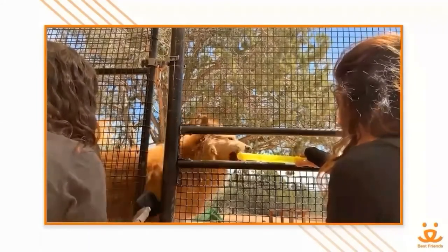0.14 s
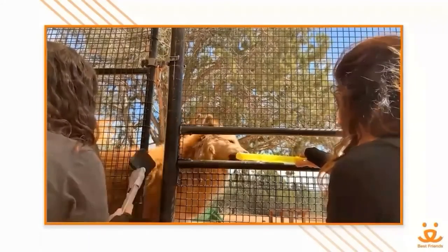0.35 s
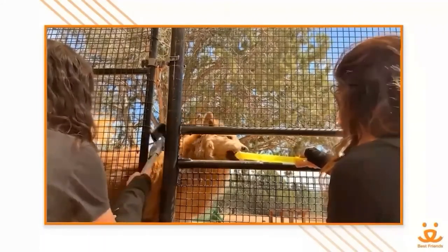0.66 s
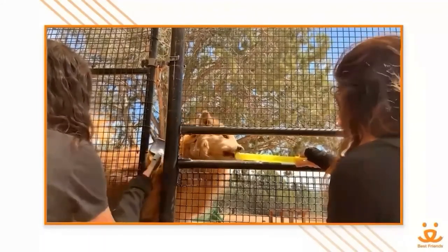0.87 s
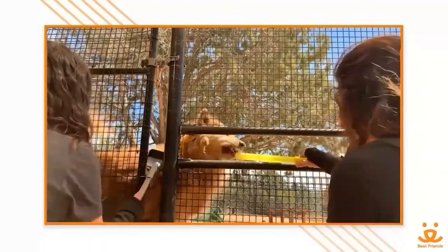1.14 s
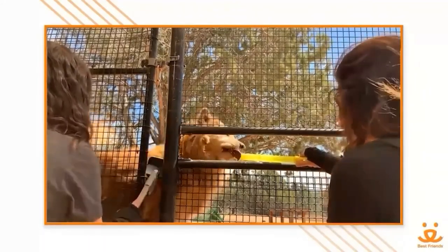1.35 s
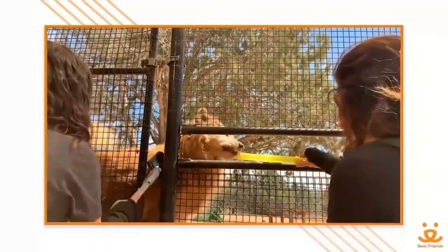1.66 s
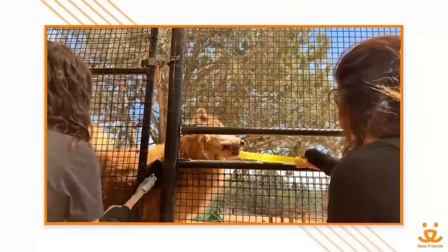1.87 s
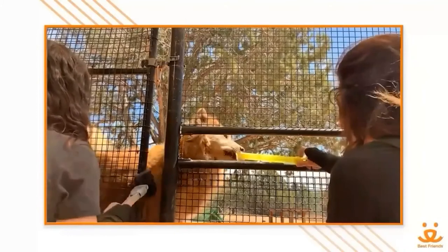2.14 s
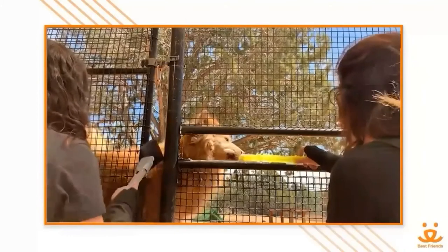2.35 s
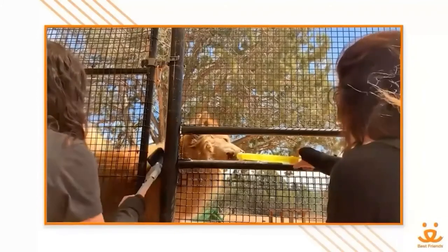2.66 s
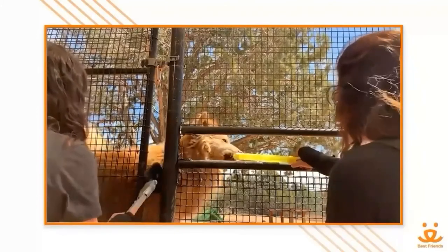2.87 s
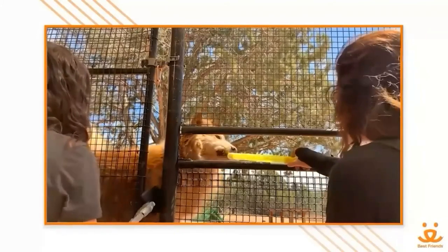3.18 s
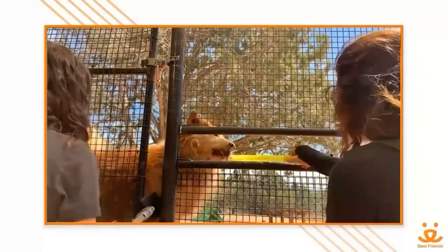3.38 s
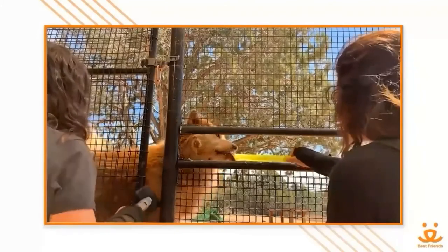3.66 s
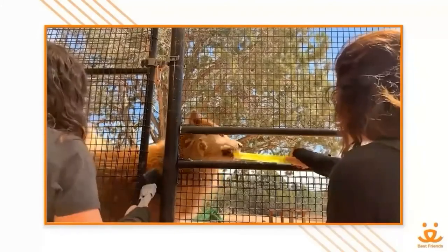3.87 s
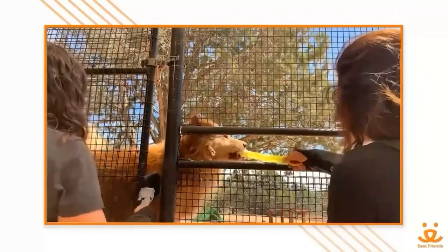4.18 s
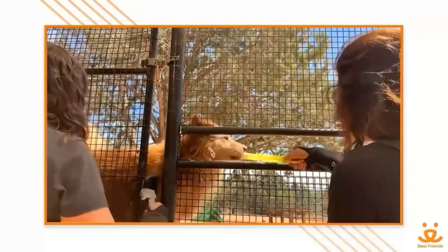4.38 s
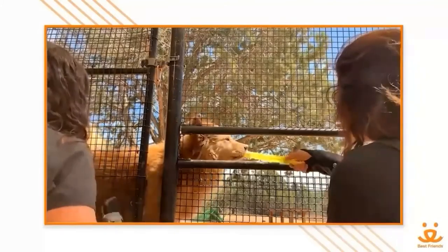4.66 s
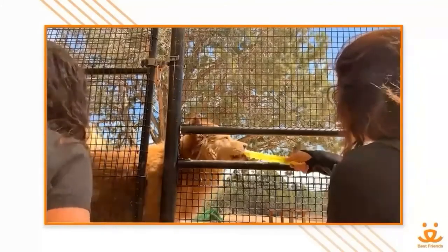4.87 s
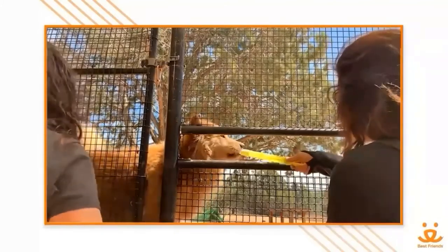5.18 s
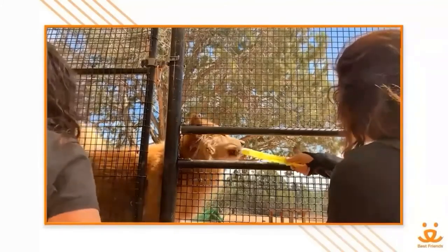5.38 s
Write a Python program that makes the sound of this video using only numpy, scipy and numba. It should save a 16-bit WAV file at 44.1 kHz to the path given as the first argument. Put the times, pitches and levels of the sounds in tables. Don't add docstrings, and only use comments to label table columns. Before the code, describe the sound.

Wet lapping, mouth pops and scratchy brush strokes beside a wire pen, with a low distant engine and wind buffeting the microphone.

```python
import sys
import numpy as np
from scipy import signal
from scipy.fft import rfft, irfft
from scipy.io import wavfile
from scipy.ndimage import uniform_filter1d
from numba import njit

SR = 44100
rng = np.random.default_rng(int(sys.argv[2]) if len(sys.argv) > 2 else 0)


def gain_from_db(level_db):
    decades = np.asarray(level_db, float) / 20
    return 10 ** decades


def output_pcm(signal):
    pcm = np.clip(np.atleast_2d(signal).T, -1, 1) * 32767
    wavfile.write(sys.argv[1], SR, np.round(pcm).astype(np.int16))


N = 244049
TIME = np.arange(N) / SR

# pitch_hz, level_db (per Hz)
AIR_COLOUR = [(150, 19.5), (200, 5.5), (285, 0), (370, 3.5), (700, -9), (980, -13), (1350, -11.5),
              (2100, -25.5), (3100, -35.5), (7500, -38), (9000, -26), (10000, -46), (11800, -31),
              (12700, -47.5)]
# time_s, gust_db
GUSTS = [(0, -60.5), (.37, -61.5), (.47, -64), (.7, -60.5), (1.7, -64.5), (2, -57), (2.4, -66.5),
         (2.65, -62), (3.15, -61.5), (3.5, -56), (3.72, -56.5), (3.9, -59.5), (4.08, -58), (4.3, -60.5),
         (4.42, -64), (4.6, -57), (4.8, -60.5), (5.53, -63)]
# time_s, peak_db, centre_hz
BUFFETS = [(0.099, -34, 66), (3.308, -26.5, 94), (3.341, -23.5, 98), (3.499, -25, 115), (3.781, -27, 150),
           (3.68, -30, 160), (.3, -34, 149), (4.036, -24, 98.4), (3.3, -30, 70), (4.32, -34, 80),
           (.13, -33, 140), (4.52, -28.5, 101), (4.631, -30, 129), (4.686, -23, 111), (3.512, -18.5, 120),
           (3.585, -16, 103), (3.696, -16, 98.3), (4.063, -19.5, 91.5), (4.479, -23, 71), (4.555, -24, 136),
           (4.592, -32.5, 145)]
# time_s, firing_hz, drone_db
ENGINE_PULLS = [
    [(.67, 71.9, -49.5), (.95, 75.7, -33), (1.06, 71.3, -35.5), (1.15, 72, -43.5), (1.28, 78, -32),
     (1.57, 80.9, -31.5), (2.05, 89.54, -30.5), (2.74, 102, -34.5), (3.45, 108.5, -39)],
    [(4.8, 81.7, -51.5), (4.884, 84.24, -36), (5.06, 85.85, -35.5), (5.14, 84.67, -30.5),
     (5.53, 89.96, -29)],
]
# time_s, peak_db, rattle_s, ring_share (0 to 1)
RATTLES = [
    (1.036, -48, .03, .9),
    (1.571, -58, .03, .5),
]
# pitch_hz, level_db, t60_s (time to fade by 60 dB)
WIRE_MODES = [(2450, -9, .1), (3680, -4, .14), (4745, -2, .2), (4823, -3, .2), (5245, 2, .22),
              (6022, -3, .1), (6128, 0, .13), (6250, -4, .14), (6350, -6, .1), (7500, -1, .08),
              (8010, 0, .1), (8420, 0, .07), (8662, 1, .08), (9400, -3, .07)]
# pitch_hz, width_hz, level_db
BRISTLE_CAVITIES = [
    (7380, 2700, 4.5),
    (8800, 4200, 11),
]
# start_s, held_s, hiss_db, scrape_db, sheen_db (last two against hiss)
DRAGS = [(0, 0.05, -68.5, -16, -19), (.1, 0.08, -78.5, -10, -16.5), (.22, 0.115, -70, -13, -14),
         (.58, 0.032, -88.5, 8.5, -7), (.72, 0.063, -88, 3.5, -4.5), (1.38, 0.04, -78, -13.5, -12),
         (1.63, 0.059, -78.5, -12.5, -8.5), (1.92, 0.11, -77.5, -16.5, -17.5), (2.05, 0.1, -69, -17.5, -4),
         (2.2, 0.27, -94.5, 6.5, -22.5), (2.7, 0.13, -88.5, 1, -9), (3.005, .13, -69, -27, -9),
         (3.17, .09, -76, -19, -13), (3.32, .115, -72, -20.5, -13), (3.601, 0.13, -75, -11, -12),
         (3.8, .15, -83, -5, -7), (4.25, 0.075, -94.5, -7, -18), (4.52, 0.07, -87, -9, -29),
         (5.065, 0.034, -85.5, -9, -7), (5.46, .07, -91, -15, -43)]
# start_s, held_s, hiss_db, scrape_db, sheen_db (as above)
JABS = [
    (.8, 0.043, -73, -3.5, 0.5),
    (1.042, 0.019, -72, -0.5, 4),
    (1.196, 0.014, -77, -4, -24),
    (1.582, 0.013, -72, -16, -6),
    (2.505, 0.014, -85, -6.5, -35),
    (4.69, 0.0088, -88.5, -3, -19),
    (4.77, 0.0067, -91, -5, -20),
]
# level_db of hiss, scrape, sheen
FUR_RUSTLE = [
    -94,
    -97,
    -120,
]
# start_s, held_s, level_db
WHISTLES = [(.235, 0.014, -63.5), (.8, .012, -70), (1.585, 0.0093, -74.5), (2.062, .02, -63),
            (2.1, .05, -60), (2.78, 0.009, -79), (3.07, 0.021, -54.5), (3.33, 0.099, -72.5),
            (3.61, 0.0088, -79), (3.83, .01, -83)]
# start_s, held_s,
# level_db, pitch_hz, width_hz
HUMS = [(0, 0.071, -75, 7100, 250), (0, 0.067, -77, 8840, 250), (.115, .03, -78, 7340, 400),
        (.225, 0.084, -77.5, 7300, 500), (1.87, 0.11, -79, 7250, 900), (2.0, 0.16, -71.5, 7200, 500),
        (2.99, 0.068, -76.5, 7330, 300), (3.415, 0.018, -73, 7300, 300), (3.65, 0.11, -80.5, 6830, 500),
        (3.82, 0.03, -80, 8310, 400), (3.9, 0.037, -77, 8340, 400), (4.49, .11, -82, 7170, 390),
        (4.25, 0.077, -87, 9100, 500), (1.59, 0.027, -80, 4930, 800), (1.585, .03, -77, 6100, 200),
        (.8, .012, -68, 1250, 200), (.392, .01, -72, 980, 200), (1.04, .08, -78, 2800, 900),
        (2.0, .14, -84, 4800, 1500), (4.5, .09, -88, 5200, 1200), (3.085, .03, -70, 760, 200),
        (3.06, 0.029, -81, 4450, 300), (3.06, 0.012, -88.5, 3350, 300), (3.73, .06, -85.5, 2400, 300)]
# pitch_hz, width_hz, level_db
MOUTH = [
    (705, 140, 2.5),
    (1162, 210, 0),
    (1600, 250, -10.5),
    (2400, 120, -11.5),
]
# start_s, held_s, slosh_db, mouth_opening_db
LAPS = [(0, 0.034, -61.5, -7.5), (.28, 0.087, -65.5, -7), (.8, 0.023, -64, -6.5), (1.3, 0.061, -69.5, -2.5),
        (1.63, 0.034, -70, 0), (2.02, 0.062, -67.5, -3.5), (2.505, 0.0073, -69, -6), (2.78, 0.053, -83, 1),
        (3.031, 0.066, -69.5, -3), (3.32, 0.059, -72, -1), (3.619, 0.1, -75, 1), (3.9, 0.034, -78.5, 0),
        (4.27, 0.036, -73.5, -12), (4.685, .015, -82.5, 0)]
# time_s, jaw_db, cheek_db
CHEWING = [
    (0, -72.5, -78),
    (5.53, -80.5, -90.5),
]
# start_s, held_s, level_db, pitch_hz
SQUELCHES = [
    (3.626, 0.069, -76.5, 1250),
    (3.711, 0.044, -73, 1260),
    (3.801, 0.05, -70.5, 1300),
    (3.836, 0.032, -67, 770),
    (3.905, 0.033, -69, 1240),
]
# time_s, peak_db, jaw_hz, mouth_opening_db, wetness_db
SMACKS = [(.282, -47.5, 800, 8.5, 0.5), (.389, -49.5, 725, -4.5, -18), (.615, -61.5, 695, -8, -25),
          (0.7993, -41, 583, -2.5, -17), (1.294, -59, 566.3, -13, -24), (1.344, -47, 652, -6, -18),
          (1.408, -51.5, 726, -1, -12), (1.659, -55.5, 587, -5, -12.5), (2.037, -52, 720, -10.5, -16),
          (2.067, -53, 549, -3.5, -2), (2.502, -43.5, 790, -0.5, -11), (2.53, -60.5, 580, 3.5, -12),
          (2.716, -72, 623, 4, 9.5), (2.777, -56.5, 619, -1, 9), (2.825, -48, 600, -9, -12.5),
          (3.028, -50, 738, -6.5, -13), (3.086, -50, 754, -25, 2), (3.623, -61.5, 730, -2, -12),
          (3.846, -60, 770, 3, -17), (3.897, -59, 790, 4, -0.5), (3.994, -54.5, 778, -0.5, -21.5),
          (4.305, -65.5, 600, 4, -16), (4.682, -50, 840, -3.5, -0.5), (4.766, -56, 780, -8, 2)]
# time_s, peak_db
TICKS = [(.723, -74), (0.768, -57), (.797, -38.5), (0.876, -67), (1.72, -72.5), (3.065, -54.5),
         (3.103, -55.5), (3.217, -61), (4.785, -73), (5.056, -69.5)]
# time_s, peak_db,
# pitch_hz, width_hz
CLICKS = [(.2825, -52, 2360, 300), (.2836, -55, 3460, 400), (0.388, -67.5, 4500, 600),
          (.391, -52, 980, 200), (.282, -53, 5500, 2500), (.797, -50, 4500, 3500), (2.778, -64, 5300, 2000),
          (2.78, -64, 12000, 2000), (2.512, -58, 1000, 250), (.696, -72, 11500, 3000),
          (.723, -72, 5500, 3000), (1.474, -72, 6500, 3500), (1.58, -62, 12500, 2500),
          (1.72, -70, 4000, 3000), (2.456, -70, 3000, 2500), (3.515, -72, 7500, 2500),
          (4.766, -64, 6200, 1500), (4.767, -62, 1600, 300), (.956, -64.5, 3500, 3000),
          (1.03, -64, 3000, 1200), (1.659, -71, 4030, 3000), (2.036, -62.5, 2140, 1200),
          (3.106, -63, 10900, 2000), (3.217, -57.5, 6400, 2000), (3.9, -66, 4500, 2500),
          (4.49, -77, 3300, 900), (4.682, -63, 9700, 1000), (.766, -58, 12400, 2500),
          (0.7966, -45, 13000, 3480), (3.217, -72, 12500, 2500), (3.898, -63.5, 12300, 2000),
          (4.766, -64.5, 12000, 2000), (1.293, -65.5, 2760, 890), (1.408, -72, 5010, 695),
          (1.964, -53.5, 4700, 2820), (2.501, -47.5, 1726, 260), (2.502, -59.5, 2400, 300),
          (2.503, -59, 3380, 500), (2.53, -74, 3400, 607), (2.716, -66, 2580, 2500),
          (2.738, -70, 2799, 600), (2.777, -54.5, 1680, 259), (2.824, -63, 1740, 260),
          (4.462, -72, 4730, 890), (4.681, -52, 3680, 3040), (4.681, -53, 1740, 403),
          (4.6954, -65, 3900, 1200), (5.081, -66, 3600, 710)]
# time_s, peak_db, pitch_hz
SPIT_BEADS = [(0.1151, -63, 7250), (0.2219, -60, 9000), (0.2433, -52, 8900), (0.3247, -54, 7080),
              (0.5028, -71, 8800), (0.6025, -66.5, 8680), (0.6958, -68, 7280), (0.7228, -70, 8850),
              (1.1997, -60, 7670), (1.2074, -63, 8500), (1.3418, -62.5, 7220), (1.3853, -61.5, 8070),
              (1.505, -68.5, 7380), (1.5973, -53.5, 8070), (1.9185, -62, 7100), (1.9634, -58, 8700),
              (1.9809, -57.5, 7230), (2.1106, -45, 9030), (2.5287, -63.5, 8100), (2.5865, -70, 7310),
              (2.6833, -66, 5800), (2.823, -59.5, 7500), (2.9861, -66, 7200), (3.0021, -67, 8800),
              (3.3253, -67, 9240), (3.5997, -62.5, 9100), (3.8774, -62, 8250), (4.5441, -68, 7200),
              (4.5655, -61, 7110), (4.9776, -76, 5600)]
# delay_s, level_db
WALL_SLAPS = [
    (.011, -16.5),
    (0.026, -27),
]


def level(x, db):
    return x * gain_from_db(db) / np.sqrt(np.mean(x ** 2))


def unit_peak(x):
    return x / np.abs(x).max()


@njit
def svf(x, hz, width):
    y, b, l = np.empty(len(x)), 0., 0.
    for i in range(len(x)):
        g, k = np.tan(np.pi * hz[i] / SR), width[i] / hz[i]
        v = (b + g * (x[i] - l)) / (1 + g * (g + k))
        b, l, y[i] = 2 * v - b, l + 2 * g * v, k * v
    return y


def band(x, hz, width):
    hz, width = hz + np.zeros(len(x)), width + np.zeros(len(x))
    return svf(svf(x, hz, width), hz, width)


def flat(x, lo_hz, hi_hz, order=4):
    edges = signal.butter(order, [lo_hz, hi_hz], "band", fs=SR, output="sos")
    return level(signal.sosfilt(edges, x), 0)


def ring(x, hz, t60):
    r, w = np.exp(-np.log(1000) / (t60 * SR)), 2 * np.pi * hz / SR
    return signal.lfilter([0, np.sin(w)], [1, -2 * r * np.cos(w), r * r], x)


def walk(rate):
    k = int(SR / rate)
    steps = np.repeat(rng.standard_normal(N // k + 1), k)
    return 1.804 * uniform_filter1d(uniform_filter1d(steps, k), k)[:N]


def curves(table):
    s, *columns = np.transpose(table)
    return [np.interp(TIME, s, c) for c in columns]


def add(out, s, x):
    i = int(s * SR)
    out[i:i + len(x)] += x[:N - i]


def swells(rows, rise_db_s, fall_db_s):
    db = []
    for s, held, peak_db in rows:
        early, late = np.maximum(s - TIME, 0), np.maximum(TIME - s - held, 0)
        db.append(peak_db - rise_db_s * early - fall_db_s * late)
    return np.sqrt(np.sum(gain_from_db(np.array(db)) ** 2, axis=0))


def grains(rate, scatter_db):
    sizes = gain_from_db(scatter_db * np.minimum(rng.exponential(size=N), 2.5))
    snaps = (rng.random(N) < rate / SR) * sizes
    return level(rng.standard_normal(N) * (1 + uniform_filter1d(snaps, size=40) * 22.0), 0)


def air():
    f, g = np.transpose(AIR_COLOUR)
    hz = np.maximum(np.arange(N // 2 + 1) * SR / N, 1)
    colour = gain_from_db(np.interp(np.log(hz), np.log(f), g)) * (hz > 130)
    hush = rfft(rng.standard_normal(N)) * colour
    octave, swell = np.log2(hz / 128), walk(.8)
    out = np.zeros(N)
    for k in range(16):
        half_octave = irfft(hush * np.clip(1 - np.abs(2 * octave - k), 0, 1), N)
        out += gain_from_db(.5 * swell - 0.24 * TIME + 1.2 * walk(13)) * half_octave
    return level(out, -61)


def wind():
    gust_db, = curves(GUSTS)
    hz = 97.6 - 0.5 * (gust_db + 60.5)
    rumble = flat(band(rng.standard_normal(N), hz, 0.76 * hz), 54, 202.6)
    deep_bed = gain_from_db(-62.5) * flat(rng.standard_normal(N), 38, 62, order=2)
    out = rumble * gain_from_db(gust_db + 16.5 + 1.6 * walk(16)) + deep_bed
    t = np.arange(-.04, .06, 1 / SR)
    for s, db, hz in BUFFETS:
        swell = np.exp(-(t * hz / 1.25) ** 2)
        add(out, s - .03, gain_from_db(db - 7.0) * swell * np.sin(2 * np.pi * hz * t * (1 - 4.5 * t)))
    return out


def favoured(hz, best_hz, width_hz, db):
    return np.maximum(db - 6 * ((hz - best_hz) / width_hz) ** 2, -63)


def engine_pulls():
    out = np.zeros(N)
    for table in ENGINE_PULLS:
        hz, drone_db = curves(table)
        turn = 2 * np.pi * np.cumsum(hz * (1 + 0.0074 * walk(21.73))) / SR
        drone = gain_from_db(drone_db + 0.46 * walk(12)) * np.sin(turn)
        octave_db = favoured(2 * hz, best_hz=180, width_hz=17, db=-51.5) + 1.4 * walk(7.1)
        octave = gain_from_db(octave_db) * (np.sin(2 * turn) + gain_from_db(-30) * np.sin(3 * turn))
        uneven_db = favoured(1.5 * hz, best_hz=152, width_hz=6, db=-52) + 2 * walk(6)
        uneven = gain_from_db(uneven_db) * np.sin(1.5 * turn)
        fade_in = np.clip((TIME - table[0][0]) / 0.027 + 1, 0, 1)
        fade_out = np.clip((table[-1][0] - TIME) / 0.07 + 1, 0, 1)
        out += np.sqrt(2) * fade_in * fade_out * (drone + octave + uneven)
    return out


def slowing_engine():
    end_s = 0.583
    hz = np.interp(TIME, (0, end_s), (161.3, 134.7)) * (1 + 0.012 * walk(14.8))
    tone = np.sin(2 * np.pi * np.cumsum(hz) / SR)
    return tone * gain_from_db(-47 + 2.06 * walk(7.8)) * np.clip((end_s - TIME) / 0.057, 0, 1)


def mesh():
    out, t = np.zeros(N), np.arange(int(.4 * SR)) / SR
    for s, db, length, share in RATTLES:
        knocks = rng.standard_normal(len(t)) * np.minimum(t / .011, 1) * np.exp(-t / length)
        wire = sum(gain_from_db(g) * ring(knocks, f, t60) for f, g, t60 in WIRE_MODES)
        rasp = flat(knocks, 4000, 7300, order=3) + 0.45 * flat(knocks, 2300, 5400, order=2)
        rasp += 0.46 * level(band(knocks, 6000., 1270.0), 0)
        add(out, s, gain_from_db(db) * unit_peak(share * level(wire, 0) + rasp))
    return out


def streaks(x, depth_db):
    spectrum = rfft(x)
    slot = np.arange(N // 2 + 1) * SR / N / 350
    out = np.zeros(N)
    for k in range(11, 30):
        tuft = irfft(spectrum * np.clip(1 - np.abs(slot - k), 0, 1), N)
        out += gain_from_db(depth_db * walk(22)) * tuft
    return out


def press(column, faster):
    def rows(table):
        return [(s, held, db + (0, *re_db)[column]) for s, held, db, *re_db in table]
    drags = swells(rows(DRAGS), max(faster, 1) * 501.5, faster * 699)
    jabs = swells(rows(JABS), 2500, faster * 185)
    return np.hypot(drags, jabs) + gain_from_db(FUR_RUSTLE[column])


def strokes():
    flicks = grains(330, 2.0)
    body = sum(gain_from_db(db + 1.2 * walk(30)) * level(band(flicks, f, w), 0) for f, w, db in BRISTLE_CAVITIES)
    hiss = streaks(flat(body, 5000, 9400, order=8), depth_db=3.0)
    whistle = band(flicks, 8950 + 40 * walk(18.0), 300)
    scrape = flat(grains(600, 2.5), 3000, 6200, order=2)
    sheen = np.zeros(N)
    for f in (12000, 12800, 13600, 14400):
        patch = np.clip(2.5 * walk(16) + 2.5, .05, 1)
        sheen += patch * gain_from_db(2 * walk(25) - f / 550) * flat(flicks, f, f + 800)
    out = level(hiss, 0) * press(column=0, faster=1)
    out += level(scrape, 0) * press(column=1, faster=0.47)
    out += level(sheen, 0) * press(column=2, faster=1.8)
    return out + level(whistle, 0) * swells(WHISTLES, rise_db_s=600, fall_db_s=600)


def hums():
    fur = grains(180, 3.0) * gain_from_db(3.0 * walk(40))
    out = np.zeros(N)
    for *row, hz, width_hz in HUMS:
        out += level(band(fur, hz, width_hz), 0) * swells([row], rise_db_s=1200, fall_db_s=600)
    return out


def lapping():
    wet = grains(200, 3.5)
    s, held, db, open_db = np.transpose(LAPS)
    jaw_bed_db, cheek_bed_db = curves(CHEWING)
    rise_db_s, fall_db_s = 305.5, 118.5
    jaw = np.hypot(swells(zip(s, held, db), rise_db_s, fall_db_s), gain_from_db(jaw_bed_db))
    cheek = np.hypot(swells(zip(s, held, db + open_db), rise_db_s, fall_db_s), gain_from_db(cheek_bed_db))
    modes = [gain_from_db(g + 2.2 * walk(30)) * level(band(wet, f, 2.54 * w), 0) for f, w, g in MOUTH]
    lips = sum(modes[2:]) * np.sqrt(cheek * jaw)
    return modes[0] * jaw * gain_from_db(-6.0) + modes[1] * cheek * gain_from_db(-2.5) + lips * gain_from_db(-4.0)


def squelches():
    wet = grains(500, 3.5)
    out = np.zeros(N)
    for *row, hz in SQUELCHES:
        squeezed = band(wet, hz * (1 + .08 * walk(20)), 0.4 * hz)
        out += level(squeezed, 0) * swells([row], rise_db_s=1500, fall_db_s=1500)
    return out


def tick(t):
    decay = np.exp(-t / 0.00021) + 0.051 * np.exp(-t / 0.0042)
    snap = rng.standard_normal(len(t)) * np.minimum(t / 0.0008, 1) * decay
    return unit_peak(flat(snap, 7200, 9500, order=4) + 0.13 * flat(snap, 8200, 11000, order=2))


def smack(t, hz, open_db, wet_db):
    pop = np.exp(-(t / 0.0001 - 4) ** 2) + 0.032 * rng.standard_normal(len(t)) * np.exp(-t / 0.013)
    jaw = band(pop, hz, 230.0)
    cheek = band(pop, MOUTH[1][0], 230.)
    lips = band(pop, MOUTH[2][0] * 1.04, 260.0) + 0.41 * band(pop, MOUTH[3][0], 290.0)
    out = unit_peak(jaw) + gain_from_db(open_db) * unit_peak(cheek)
    return out + gain_from_db(open_db - 6.5) * unit_peak(lips) + gain_from_db(wet_db + 1.5) * tick(t)


def click(t, hz, width_hz):
    knock = (1. * (t == 0) + 0.1 * rng.standard_normal(len(t))) * np.exp(-t / 0.0037)
    return unit_peak(band(knock, hz, width_hz))


def mouth_snaps():
    out, t = np.zeros(N), np.arange(int(0.075 * SR)) / SR
    for s, db, hz, open_db, wet_db in SMACKS:
        add(out, s - .0012, gain_from_db(db) * smack(t, hz, open_db, wet_db))
    for s, db in TICKS:
        add(out, s - .0012, gain_from_db(db + 6.5) * tick(t))
    for s, db, hz, width_hz in CLICKS:
        add(out, s - .0006, gain_from_db(db) * click(t, hz, width_hz))
    for s, db, hz in SPIT_BEADS:
        add(out, s - .0006, gain_from_db(db) * click(t, hz, 1300.))
    for delay, db in WALL_SLAPS:
        add(out, delay, gain_from_db(db) * out.copy())
    return out


def scene():
    background = air() + wind() + engine_pulls() + slowing_engine()
    brushing = mesh() + strokes() + hums()
    mouth = lapping() + squelches() + mouth_snaps()
    return (background + brushing + mouth)[None]


def roll_off(x):
    return signal.sosfilt(signal.butter(12, 15220, fs=SR, output="sos"), x)


def record(dry):
    x = signal.sosfilt(signal.butter(3, 44, "high", fs=SR, output="sos"), dry)
    x = signal.sosfilt(signal.ellip(8, .2, 60, 15150, fs=SR, output="sos"), x)
    return roll_off(x)


dry = scene()
out = record(dry)
output_pcm(out)
```